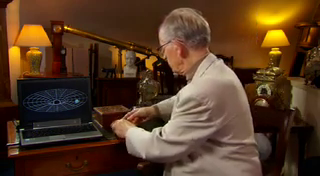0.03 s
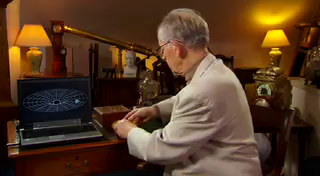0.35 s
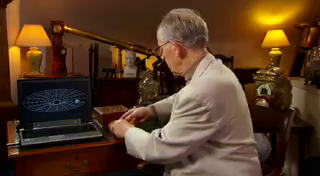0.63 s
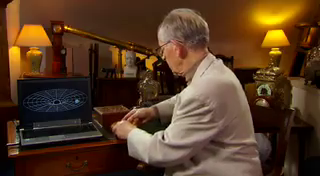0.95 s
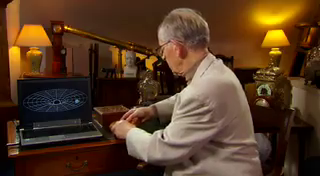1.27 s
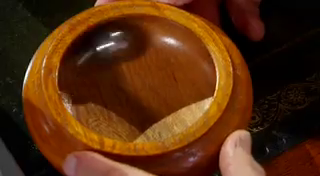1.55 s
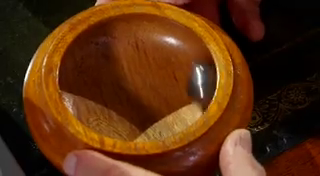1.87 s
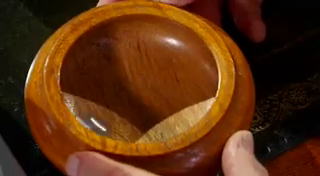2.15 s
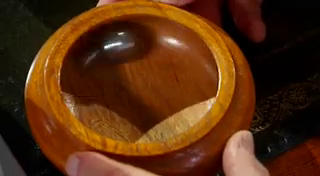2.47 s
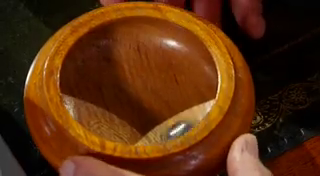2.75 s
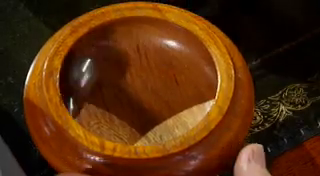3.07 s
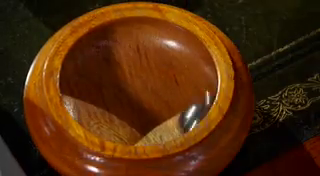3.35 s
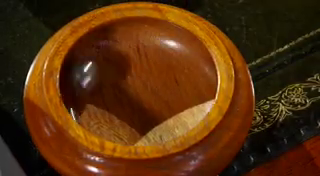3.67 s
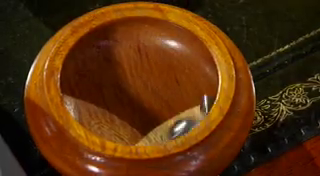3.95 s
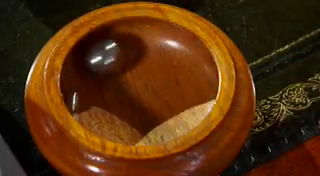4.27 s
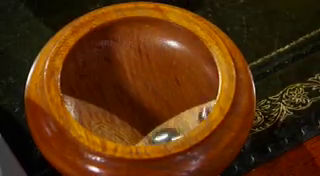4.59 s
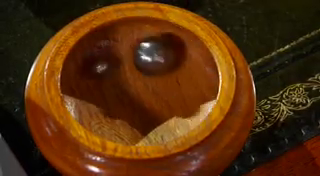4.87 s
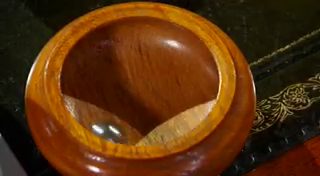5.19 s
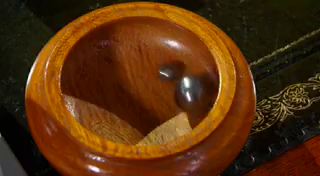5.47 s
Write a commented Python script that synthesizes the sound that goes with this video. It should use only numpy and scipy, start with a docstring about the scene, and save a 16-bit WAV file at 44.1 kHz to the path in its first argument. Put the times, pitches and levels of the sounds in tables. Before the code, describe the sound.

Heard close up in a small furnished room, a wooden bowl rings with two quick knocks as steel balls land in it. They circle with a grainy rumble and rattle that grows louder and brighter. After one sharp clack of the bowl against the desk, the rolling settles into a gentler, pulsing orbit with low booms, occasional ticks and light clacks.

```python
"""Steel balls in a wooden bowl

Two steel balls, one large and one small, are dropped into a turned wooden bowl, swirled by hand and
left to orbit. The grain shakes the bowl: a roar, a rumble, a chatter of tiny hops, and a wall ring
that throbs as the balls go round. The bowl rocks and clacks on the desk, once hard; a few light
ticks and clinks sound in a small furnished room."""
import sys
import numpy as np
from scipy import signal
from scipy.fft import rfft, irfft
from scipy.io import wavfile
from scipy.ndimage import uniform_filter1d

SR = 44100
rng = np.random.default_rng(int(sys.argv[2]) if len(sys.argv) > 2 else 0)


def generate_wav(signal):
    """Clip the signal to [-1, 1] and save it as 16-bit WAV at the path in sys.argv[1]."""
    frames = np.transpose(np.atleast_2d(signal))
    scaled = np.clip(frames, -1, 1) * 32767
    pcm = np.round(scaled).astype(np.int16)
    wavfile.write(sys.argv[1], SR, pcm)


N = 243873
T = np.arange(N) / SR

# how hard the balls run, swirled up and left to coast; each layer takes a share: time_s, effort_db
EFFORT = [(0.0, -1), (0.3, 6), (0.66, 2.5), (0.9, 8.5), (1.18, 7), (1.29, 12), (1.52, 10.5), (1.78, 16),
          (2.03, 9.5), (2.5, 7), (2.85, 7), (3.15, 4), (3.8, 0.5), (4.33, 3), (4.49, 7.5), (4.55, 13),
          (4.75, 3), (5.53, 4.5)]
def rolling(angle):
    """The balls ride fine grain and hop on coarser ridges; the faster, the louder and brighter."""
    effort, slow = curve(EFFORT), lull(angle)
    swell, gritty, heavy = swooping(angle)
    hops = hopping()
    grain = bumps(per_s=6000, spread_db=4)
    coarse = ridges(bumps(per_s=3000, spread_db=3), angle, lag_s=.008, swing=.13, share=.5)
    fine = ridges(grain + undb(-3) * hops, angle, lag_s=.0045, swing=.14, share=.55)
    # faders: a base level in dB, ridden by the effort and the swoops
    roar_db = -50.5 + .91 * effort + swell + hand_push()
    hollow_db = -56.5 + .94 * effort + .51 * swell - 13 * slow + hand_push()
    chatter_db = -56 + 1.555 * effort + swell
    scour_db = -64.5 + .8 * effort + swell + gritty / 2 - 9 * slow
    grit_db = -70.5 + 1.24 * effort + delayed(1.05 * swell + gritty, lag_s=.0026)
    lows = rumble(coarse, heavy) + rocking(effort)
    mids = roar(fine) * undb(roar_db) + hollow(fine) * undb(hollow_db)
    wall = chatter(grain, hops) * undb(chatter_db) + scour(fine) * undb(scour_db)
    grit = (taps(hops) + whirr(grain, hops)) * undb(grit_db)
    return lows + mids + wall + grit + singing() + groans() + skids(hops) + rattles(hops) + skips()


# the rolling swells or dips, mostly about twice a lap; the row at 4.56 s shapes the level just
# after a rattle: time_s, swell_db, grit_db, rumble_db
SWOOPS = [(0.088, 4, 4, -10.5), (0.419, 0, 2, -15.5), (0.829, -1, 5.5, 2.5), (1.071, 2, 0, 0.5),
          (1.392, -2.5, 5.5, 1), (1.649, -3, 2, 1), (1.9, -1.5, 0.5, -1), (2.133, -1.5, 3.5, -2),
          (2.397, 2, 1, -3.5), (2.685, 2.5, 3, 3.5), (2.962, 2.5, 2, 4.5), (3.284, 2.5, 5, 6),
          (3.604, 3.5, 5, 0.5), (3.966, 1.5, 3.5, 2), (4.296, 1, 4.5, -7), (4.56, -8.5, 1, -4.5),
          (4.727, 3.5, 0, 0), (5.052, 2, 4, 5.5), (5.365, 0, 5, -0.5)]
def swooping(angle):
    """The rolling swells or dips round each listed time; returns dB rides for swell, grit, rumble."""
    nearest = np.clip(np.round(angle / np.pi).astype(int), 0, len(SWOOPS) - 1)
    shape = np.abs(np.cos(angle)) ** .8  # a higher power makes each swoop briefer
    swell, gritty, heavy = np.array(SWOOPS)[nearest, 1:].T * shape
    slow = lull(angle)
    return swell - 1.8 * slow, gritty - 4 * slow, heavy - 3 * slow


def swoop_angle():
    """Phase of the rolling's throb, in radians: it advances by pi from one swell or dip to the next."""
    times = np.array(SWOOPS)[:, 0]
    times = np.r_[2 * times[0] - times[1], times, 2 * times[-1] - times[-2]]
    return np.pi * np.interp(T, times, np.arange(len(times)) - 1)


def lull(angle):
    """Depth of the quiet spell between swoops once the balls coast, 0 to 1."""
    coasting = np.interp(T, [2.2, 2.6], [0, 1])
    return coasting * np.sin(angle) ** 2


# the hand pushes the bowl round: peak_s, half_length_s, boost_db
PUSHES = [(0.585, 0.017, 6.5), (0.874, 0.08, 9.5), (1.385, 0.055, 10), (1.79, 0.04, -1.5)]
def hand_push():
    """The hand presses the balls into the wood; a level ride in dB."""
    return swells(PUSHES)


def bumps(per_s, spread_db):
    """The grain gives random tiny impacts of uneven size; rms 1."""
    size_db = spread_db * np.clip(rng.standard_normal(N), -2, 2)
    hits = rng.random(N) < per_s / SR
    return unit(hits * undb(size_db) * rng.choice([-1, 1], N))


def hopping(per_s=125, spread_db=3.5, evenness=25, count=2000):
    """A skipping ball lands again and again at nearly even intervals; rms 1."""
    landing_s = np.cumsum(rng.gamma(evenness, 1 / (evenness * per_s), count))
    force = undb(spread_db * np.clip(rng.standard_normal(count), -2, 2))
    return unit(np.bincount((landing_s * SR).astype(int), force, N)[:N])


def ridges(force, angle, lag_s, swing, share):
    """Ridges repeat each bump; the gap glides as the ball speeds up and slows."""
    gap_s = lag_s * (1 + swing * np.cos(2 * angle))
    return unit(force + share * delayed(force, gap_s))


# the midrange voice of the rolling: freq_hz, level_db
ROAR_EQ = [(70, -32), (150, -28.5), (280, 9.5), (450, -8.5), (640, -14.5), (850, -18), (1020, 6.5),
           (1250, 7.5), (1500, 7.5), (1750, -6), (1950, -13.5), (2400, -24), (3100, -53.5), (6000, -64.5)]
def roar(force):
    """Fine grain shakes the whole bowl into a broad roar."""
    return steady(through(force, colour(ROAR_EQ)), window_s=.08)


# the hollow of the bowl: freq_hz, level_db
HOLLOW_EQ = [(300, -37.5), (560, -1), (700, -6.5), (850, -3.5), (1020, 8), (1200, -15.5), (1500, -19.5)]
def hollow(force):
    """The hollow of the bowl resonates under a running ball."""
    return steady(through(force, colour(HOLLOW_EQ)), window_s=.08)


# the wall's split pair of bending modes: pitch_hz, t60_s, level_db
WALL_PAIR = [(1672, .13, 0), (1538, .11, -7)]
def chatter(grain, hops):
    """Hops knock on the wall, harder while the bowl is held; grain keeps its pair faintly ringing."""
    pair = steady(through(grain, ring(WALL_PAIR)), window_s=.1)
    hop_db = np.interp(T, [1.8, 2.6], [-2, -3.5])
    return undb(-5) * pair + undb(hop_db) * unit(through(hops, soft_blow()))


def soft_blow(pitch_ratio=1, contact_hz=2300, mode_hz=1630, t60_s=.018):
    """The wall's damped main mode under a ball, whose contact is too long to excite much above it."""
    return edge(ring([(mode_hz * pitch_ratio, t60_s, 0)]), contact_hz, "low", order=4)


# the wall sings out: peak_s, half_length_s, level_db, lower_mode_db
SINGS = [(0.59, 0.025, -46, -6), (1.07, 0.025, -43, -8), (1.28, 0.03, -42, -8), (1.4, 0.035, -41, -4),
         (1.69, 0.035, -38, -10), (1.778, 0.022, -31.5, -1), (1.83, 0.04, -31.5, -6),
         (1.905, 0.035, -34, -3), (2.026, 0.036, -35, -15), (2.135, 0.034, -35, -15),
         (2.274, 0.03, -41, -10), (2.415, 0.04, -41, -12), (2.5, 0.02, -46, -6), (2.575, 0.035, -41.5, -7),
         (2.689, 0.03, -46, -14), (2.79, 0.045, -45, -8), (2.98, 0.042, -41, -12),
         (3.079, 0.025, -46.5, -14), (3.293, 0.025, -41, -15), (3.43, 0.03, -44, -15),
         (3.589, 0.034, -44.5, -15), (3.726, 0.028, -51, -12), (3.962, 0.028, -43.5, -15),
         (4.105, 0.035, -47, -15), (4.28, 0.035, -51, -12), (4.56, 0.05, -45, -10), (4.68, 0.025, -44, -5),
         (4.748, 0.032, -39.5, -5), (4.855, 0.04, -45.5, -12), (5.053, 0.027, -40, -15),
         (5.19, 0.032, -45.5, -15), (5.349, 0.032, -44.5, -15), (5.486, 0.028, -50.5, -15)]
def singing(wander_rad=.6, rise_hz=13):
    """As a ball crosses an antinode, the wall pair swells to a near-pure, slightly rising tone."""
    upper, lower = (2 * np.pi * hz * T + wander_rad * walk(45) for hz, _, _ in WALL_PAIR)
    out = np.zeros(N)
    for peak_s, half_s, db, lower_db in SINGS:
        near = np.abs(T - peak_s) < 3 * half_s
        glide = np.pi * rise_hz * (T[near] - peak_s) ** 2 / half_s
        tone = np.sin(upper[near] + glide) + undb(lower_db) * np.sin(lower[near] + glide)
        out[near] += undb(db) * hump(peak_s, half_s)[near] * np.sqrt(2) * tone
    return out


# the low end of bowl and desk together: freq_hz, level_db
RUMBLE_EQ = [(60, -53), (130, -51.5), (205, -2.5), (245, 6.5), (280, 0), (335, -2.5), (410, -4),
             (480, -2.5), (590, -3.5), (660, -10.5), (745, -7), (1000, -58.5)]
# woody resonances of the bowl on the desk: pitch_hz, t60_s, level_db
BODY_MODES = [(244, .05, -4), (280, .05, -4), (413, .08, -1), (470, .12, 0), (595, .1, -6), (738, .08, -7)]
# the rumble's fader, before the swoops are added: time_s, level_db
RUMBLE_FADER = [(0.0, -36), (0.3, -42.5), (0.43, -23.5), (0.72, -47.5), (0.84, -42), (1.15, -41),
                (1.5, -41.5), (2.05, -40), (2.5, -42.5), (2.85, -48), (3.15, -51), (3.8, -47.5),
                (4.2, -48.5), (4.6, -43), (5.2, -52), (5.53, -44.5)]
def rumble(force, swoop_db):
    """Coarse grain shakes bowl and desk; the bowl radiates little deep bass."""
    broad = unit(through(force, colour(RUMBLE_EQ)))
    woody = unit(through(force, ring(BODY_MODES)))
    radiated = edge(broad + undb(-8) * woody, 170, "high", order=4)
    return steady(radiated, window_s=.12) * undb(curve(RUMBLE_FADER) + swoop_db)


# the boom of the bowl on the desk: freq_hz, level_db
BOOM_EQ = [(60, -38), (120, -35), (148, -7), (166, -2), (183, 3), (200, -10), (260, -30)]
# the boom swells: peak_s, half_length_s, boost_db
BOOMS = [(0.68, 0.041, 7), (1.23, 0.07, 8), (1.82, 0.17, 10), (2.14, 0.06, 11), (2.36, 0.1, 9),
         (2.72, 0.08, 12), (3.0, 0.055, 13), (3.27, 0.05, 9), (3.77, 0.047, 11), (4.07, 0.06, 8.5),
         (4.38, 0.044, 11), (4.58, 0.052, 6.5), (4.76, 0.055, 14.5), (5.03, 0.044, 7), (5.52, 0.044, 9)]
def rocking(effort):
    """The circling weight rocks the bowl, and it booms on the desk."""
    boom = through(bumps(per_s=3000, spread_db=3), colour(BOOM_EQ))
    return steady(boom, window_s=.1) * undb(-52.5 + .36 * effort + swells(BOOMS))


# a scouring band just above the wall pair: freq_hz, level_db
SCOUR_EQ = [(1200, -22.5), (1900, 8.5), (2350, 1.5), (2650, -8.5), (2950, -15.5), (3700, -19)]
def scour(force):
    """Steel scours finely over the wood."""
    return unit(through(force, colour(SCOUR_EQ)))


# the tap of one small hop: freq_hz, level_db
TAP_EQ = [(900, -4), (1650, 16), (1950, -3.5), (2400, 5), (2750, 3.5), (3150, -4.5), (6000, -24.5)]
def taps(hops):
    """Each hop lands with a dry tap."""
    return unit(through(hops, colour(TAP_EQ)))


# the bowl's upper modes: pitch_hz, t60_s, held_db, standing_free_db
UPPER_MODES = [(3733, 0.02, 3.5, 0.5), (4240, 0.0089, -1.5, 5), (4644, 0.014, -2.5, 4),
               (5840, 0.025, -5.5, -12), (6260, 0.017, -1, -9), (6750, 0.011, -1, -3),
               (6970, 0.01, -12.5, -8), (7510, 0.018, -2, -3), (8970, 0.0067, -6, -7.5),
               (10090, 0.017, -16, -4)]
# the gritty top of the rolling: freq_hz, level_db
GRIT_EQ = [(1000, -20), (2300, -4), (3100, -7), (4400, -1), (5300, -9), (6800, -2), (8300, -10),
           (9900, -11), (11000, -19), (15600, -29), (16200, -58)]
def whirr(grain, hops):
    """Grain and hops ring the upper modes; each flares and fades at random; the hands tilt the mix."""
    free = np.clip((T - 1.7) / .63, 0, 1)  # the hands let go
    force = grain + undb(2) * hops
    modes = 0
    for hz, t60_s, held_db, free_db in UPPER_MODES:
        flare_db = 2.5 * walk(11) + 2.5 * walk(90)
        mode = through(force * undb(flare_db), ring([(hz, t60_s, 0)]))
        mode *= undb(held_db + (free_db - held_db) * free)
        modes += delayed(mode, lag_s=.0006 * walk(12))  # the pitch wavers
    grit = unit(through(grain + undb(-3) * hops, colour(GRIT_EQ)))
    return unit(unit(modes) + undb(-8) * grit)


def upper_ring():
    """The upper modes struck together by a contact too long to reach the very top; energy 1."""
    struck = edge(ring([mode[:3] for mode in UPPER_MODES]), 10000, "low", order=4)
    return struck / np.linalg.norm(struck)


# falling groans: peak_s, half_length_s, middle_pitch_hz, level_db
GROANS = [(0.56, 0.081, 450, -46), (1.16, 0.065, 368.7, -39), (1.6, 0.044, 325.4, -43.5),
          (2.07, 0.11, 324.5, -48), (2.6, 0.053, 304.4, -45), (4.02, 0.05, 460, -50)]
def groans(octaves_per_s=-4.5, width_hz=29):
    """A narrow band of rumble slides down as even ridges pass more slowly under a ball."""
    out = np.zeros(N)
    for peak_s, half_s, hz, db in GROANS:
        pitch_hz = hz * 2 ** (octaves_per_s * np.clip(T - peak_s, -2 * half_s, 2 * half_s))
        phase = 2 * np.pi * np.cumsum(pitch_hz) / SR
        band = walk(2 * width_hz) * np.cos(phase) + walk(2 * width_hz) * np.sin(phase)
        out += undb(db) * hump(peak_s, half_s) * steady(band, window_s=.05)
    return out


# a ball slips and rasps: peak_s, half_length_s, centre_hz, width_hz, level_db
SKIDS = [(0.805, 0.035, 7600, 250, -64), (0.937, 0.037, 6450, 600, -60), (1.025, 0.013, 4380, 450, -49),
         (1.273, 0.02, 3760, 220, -44.5), (1.346, 0.03, 6560, 500, -66), (1.433, 0.017, 3650, 200, -50),
         (1.679, 0.031, 3750, 260, -46), (1.68, 0.043, 4500, 398, -52), (1.88, 0.01, 4200, 700, -46),
         (2.379, 0.038, 3790, 300, -53), (3.643, 0.023, 3760, 250, -63), (3.955, 0.013, 3640, 400, -58),
         (4.22, 0.032, 4200, 400, -64), (4.656, 0.0096, 4360, 800, -54), (4.75, 0.022, 4470, 700, -57),
         (5.104, 0.014, 4400, 400, -75), (5.315, 0.025, 4200, 400, -61)]
def skids(hops, scratch_s=.0027):
    """A slipping ball scratches once per hop; each slip excites its own patch of the bowl's treble."""
    scratches = rng.standard_normal(N) * through(hops, np.exp(-T[:2000] / scratch_s))
    out = np.zeros(N)
    for peak_s, half_s, hz, width_hz, db in SKIDS:
        band = signal.butter(2, [hz - width_hz / 2, hz + width_hz / 2], "band", fs=SR, output="sos")
        rasp = steady(signal.sosfilt(band, scratches), window_s=.03)
        out += undb(db) * hump(peak_s, half_s) * rasp
    return out


# short rattling runs: peak_s, half_length_s, level_db
RATTLES = [(0.748, 0.011, -41), (0.815, 0.016, -42), (1.345, 0.086, -41), (1.558, 0.0071, -37.5),
           (1.635, 0.0092, -51), (1.777, 0.012, -55), (2.093, 0.016, -55), (2.79, 0.011, -44.5),
           (4.75, 0.015, -46), (5.35, 0.095, -59)]
def rattles(hops):
    """Runs of harder hops knock on the wall one by one."""
    hit = soft_blow() + undb(-6) * colour(TAP_EQ) + undb(-14.5) * upper_ring()
    envelope = sum(undb(db) * hump(peak_s, half_s) for peak_s, half_s, db in RATTLES)
    return unit(through(hops, hit)) * envelope


# single hard landings: start_s, level_db, upper_modes_db
SKIPS = [(0.0773, -12, -20), (0.085, -15, -15), (0.0978, -8.5, -17), (0.121, -22, -27), (0.132, -16, -14),
         (0.1376, -12, -20), (0.1442, -8, -31), (0.8027, -15, -29), (0.81, -30, -21), (0.8416, -18, -32),
         (0.9355, -13.5, -16), (0.946, -14, -24), (0.9637, -12.5, -16.5), (1.0536, -22, -23),
         (1.06, -14, -29), (1.0715, -4.5, -26), (1.258, -10, -18), (1.271, -16, -12), (1.292, -15, -11),
         (1.43, -9, -20), (1.622, -8.5, -34), (1.7132, -11, -18), (1.7572, -15, -16), (1.771, -10, -40),
         (1.782, -10, -32), (2.115, -12, -23), (2.2737, -12.5, -15.5), (2.41, -10, -28), (3.937, -16, -17),
         (4.515, -18, -19), (4.522, -15.5, -13), (4.5341, -19, -15), (4.5435, -22, -14), (4.555, -17, -31),
         (4.6803, -18, -16)]
def skips():
    """A ball jumps clear and lands: the wall's main mode, a dry tap and a little upper ring."""
    out = np.zeros(N)
    body = soft_blow(pitch_ratio=1.06) + undb(-7) * colour(TAP_EQ)
    upper = upper_ring()
    for start_s, db, upper_db in SKIPS:
        add(out, start_s, undb(db) * (body + undb(upper_db) * upper))
    return out


# the balls drop in: start_s, level_db, pitch_ratio, treble_db, thud_db, sway_db, ping_hz, ping_db
DROPS = [(0.1596, 15.5, 1.025, -27, -21, -13, 7480, -27), (0.3904, 7.5, .97, -19.5, -14, -20, 5850, -23)]
def drops():
    """A dropped ball rings the bowl, its load shifting the pitch, pings, and thuds into the desk."""
    out = np.zeros(N)
    for start_s, db, pitch_ratio, treble_db, thud_db, sway_db, ping_hz, ping_db in DROPS:
        blow = soft_blow(pitch_ratio, contact_hz=2150)
        wall = blow + undb(-26) * colour(ROAR_EQ) + undb(-24) * ring(WALL_PAIR)
        crack = upper_ring() + undb(-2) * burst(CRACK_EQ, t60_s=.011)
        treble = undb(treble_db) * edge(crack, 13000, "low")
        ping = ring([(ping_hz, .012, ping_db)])
        thud = undb(thud_db) * burst(RUMBLE_EQ, t60_s=.14)
        sway = undb(sway_db) * ring([(15.5, .31, 0), (59, .15, -10)])
        add(out, start_s, undb(db) * (wall + treble + ping + thud + sway))
    return out


# the ring of the bowl's foot and the desk top: pitch_hz, t60_s, level_db
FOOT_MODES = [(290, 0.044, 0.5), (984, 0.017, 3), (740, 0.038, -11), (1600, 0.032, -0.5),
              (1880, 0.014, -26), (2220, 0.06, -12.5), (2940, 0.063, -16), (3990, 0.04, -15),
              (4470, 0.01, -4.5), (5080, 0.0097, -14), (6000, 0.012, -14), (6950, 0.031, -31),
              (6900, 0.11, -12), (9800, 0.011, -31)]
# the dense tail of the desk top: freq_hz, level_db
DESK_TAIL_EQ = [(200, -18), (1000, 24.5), (2500, 19), (4400, -4), (7500, -4), (9000, 5), (15000, -65)]
# the foot comes down: start_s, level_db, room_send_db
CLACKS = [(2.1767, 0, -13), (3.2752, -21, 0), (4.2863, -27, -5), (5.035, -20, 0)]
def clacks(contact_hz=13500):
    """The rocking bowl drops its foot on the desk; returns the direct sound and the room send."""
    direct, send = np.zeros(N), np.zeros(N)
    for start_s, db, send_db in CLACKS:
        crack = undb(-5) * burst(CRACK_EQ, t60_s=.0031)
        tail = undb(1) * burst(DESK_TAIL_EQ, t60_s=.11)
        sway = ring([(20.3, .074, -7), (74, .135, -10)])
        clack = undb(db) * edge(ring(FOOT_MODES) + crack + tail + sway, contact_hz, "low")
        add(direct, start_s, clack)
        add(send, start_s, undb(send_db) * edge(clack, 1800, "high"))
    return direct, send


# the crack of a hard contact: freq_hz, level_db
CRACK_EQ = [(500, -3), (1700, 3), (2400, 5), (3100, -2), (4400, 2), (5500, -2), (7000, -1), (9000, -9),
            (12000, -20), (16500, -37)]
# light dry ticks: start_s, level_db, low_cut_hz, high_cut_hz, room_send_db
TICKS = [(0.3407, -19, 3140, 7500, -12), (0.5266, -24, 2000, 6500, -25), (2.6988, -21, 1610, 6000, -20),
         (2.7356, -23, 1500, 6500, -2.5)]
def ticks():
    """Small hard contacts crack and ring the bowl; returns the direct sound and the room send."""
    direct, send = np.zeros(N), np.zeros(N)
    for start_s, db, low_hz, high_hz, send_db in TICKS:
        crack = undb(-9.5) * burst(CRACK_EQ, t60_s=.012)
        contact = crack + undb(-4.5) * upper_ring() + undb(3) * soft_blow()
        tick = undb(db) * edge(edge(contact, low_hz, "high", order=4), high_hz, "low")
        add(direct, start_s, tick)
        add(send, start_s, undb(send_db) * tick)
    return direct, send


# the ping of steel: pitch_hz, t60_s, level_db
STEEL_MODES = [(6099, .026, 0), (6788, .03, -5), (7913, .025, -12), (9082, .022, -15), (11300, .012, -15),
               (12500, .008, -18)]
# the bright crack of steel: freq_hz, level_db
STEEL_CRACK_EQ = [(2000, -25), (5500, -7), (7000, 0), (11000, -5), (13500, -13), (16000, -30)]
# the two balls touch: start_s, level_db
CLINKS = [(1.031, -23), (1.0962, -24.5)]
def clinks():
    """Steel meets steel: a very short crack and a high ping."""
    out = np.zeros(N)
    for start_s, db in CLINKS:
        crack = undb(-7) * burst(STEEL_CRACK_EQ, t60_s=.009)
        add(out, start_s, undb(db) * (ring(STEEL_MODES) + crack))
    return out


def room(send, low_t60_s=.34, high_t60_s=.22, split_hz=2500, onset_s=.003, size=20000):
    """Dense reflections of a furnished room; the treble dies first."""
    t, noise = T[:size], rng.standard_normal(size)
    low = edge(noise, split_hz, "low", order=1)
    tail = low * decay(t, low_t60_s) + (noise - low) * decay(t, high_t60_s)
    tail = edge(tail * (1 - np.exp(-t / onset_s)), 7400, "low")
    return through(send, tail / np.linalg.norm(tail))


# room tone: freq_hz, level_db
AIR_EQ = [(20, 0), (45, -2), (75, 1), (120, -9), (400, -15), (1500, -25), (4000, -32), (9000, -37),
          (15600, -42), (16200, -70)]
def air():
    """The still air of the room, a faint dark bed of noise."""
    return undb(-59.5) * unit(through(rng.standard_normal(N), colour(AIR_EQ)))


def undb(db):
    """Decibels to gain."""
    return 10 ** (np.asarray(db) / 20)


def unit(x):
    """Scale to rms 1."""
    return x / np.sqrt(np.mean(x ** 2))


def steady(x, window_s):
    """Even out the slow chance swells of a narrow resonance; rms 1."""
    return x / np.sqrt(uniform_filter1d(x ** 2, int(window_s * SR)) + 1e-12)


def through(x, response):
    """Pass a sound through an impulse response."""
    return signal.fftconvolve(x, response)[:len(x)]


def add(out, start_s, x):
    """Mix a sound in at a time."""
    i = int(start_s * SR)
    out[i:i + len(x)] += x[:N - i]


def delayed(x, lag_s):
    """Delay a sound by a constant or moving time."""
    return np.interp(T - lag_s, T, x, left=0)


def edge(x, hz, kind, order=2):
    """Low-pass or high-pass."""
    return signal.sosfilt(signal.butter(order, hz, kind, fs=SR, output="sos"), x)


def colour(eq, size=8192):
    """Impulse response of an EQ curve, falling steeply above its last point; energy 1."""
    hz, db = np.transpose(eq)
    bins_hz = np.maximum(np.arange(size // 2 + 1) * SR / size, 1)
    skirt_db = -30 * np.log2(np.clip(bins_hz / hz[-1], 1, 4))
    gain = undb(np.interp(np.log(bins_hz), np.log(hz), db) + skirt_db)
    cepstrum = irfft(np.log(gain))
    cepstrum[1:size // 2] *= 2  # fold to minimum phase, so nothing rings before the hit
    cepstrum[size // 2 + 1:] = 0
    response = irfft(np.exp(rfft(cepstrum)))
    return response / np.linalg.norm(response)


def decay(t, t60_s):
    """A fade of 60 dB every t60_s."""
    return np.exp(-np.log(1000) * t / t60_s)


def ring(modes, size=8192):
    """Fading sines from rows of pitch_hz, t60_s, level_db; the level sets each mode's energy."""
    t = T[:size]
    sines = [np.sin(2 * np.pi * hz * t) * decay(t, t60_s) for hz, t60_s, _ in modes]
    return sum(undb(db) * sine / np.linalg.norm(sine) for (_, _, db), sine in zip(modes, sines))


def burst(eq, t60_s, size=8192):
    """A fading puff of coloured noise; energy 1."""
    puff = through(rng.standard_normal(size) * decay(T[:size], t60_s), colour(eq))
    return puff / np.linalg.norm(puff)


def walk(per_s):
    """Random levels joined smoothly; rms 1."""
    hold = int(SR / per_s)
    steps = rng.standard_normal(1000)[np.arange(N) // hold]
    return unit(uniform_filter1d(steps, hold))


def curve(points):
    """A fader move through rows of time_s, value."""
    return np.interp(T, *np.transpose(points))


def hump(peak_s, half_s):
    """A smooth rise and fall round a moment; top 1."""
    return np.exp(-((T - peak_s) / half_s) ** 2)


def swells(events):
    """A level ride in dB from rows of peak_s, half_length_s, boost_db."""
    return sum(db * hump(peak_s, half_s) for peak_s, half_s, db in events)


def scene():
    """The bowl close by, a near reflection of the drops, the room behind."""
    angle = swoop_angle()
    roll = rolling(angle) + clinks()
    drop = drops()
    clack, clack_send = clacks()
    tick, tick_send = ticks()
    reflection = undb(-14) * edge(delayed(drop, lag_s=.0122), 4500, "low", order=1)
    roll_send = delayed(roll, lag_s=.0004 * np.cos(angle))  # the path to the walls keeps shifting
    reverb = room(undb(-15) * roll_send + undb(-16.5) * drop + clack_send + tick_send)
    return (roll + drop + clack + tick + reflection + reverb + air())[None]


def record(dry, cut_hz=16700):
    """A steep low-pass takes off the very top."""
    return signal.sosfilt(signal.ellip(10, .2, 70, cut_hz, fs=SR, output="sos"), dry)


dry = scene()
out = record(dry)
generate_wav(out)
```